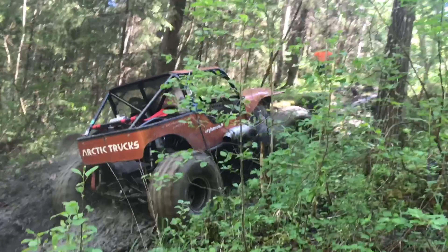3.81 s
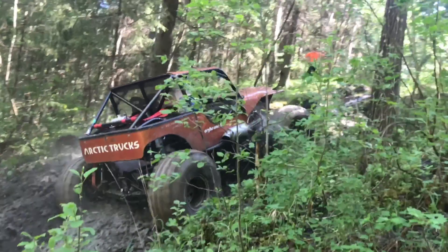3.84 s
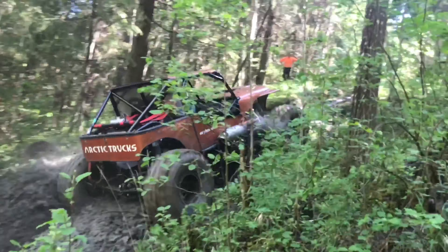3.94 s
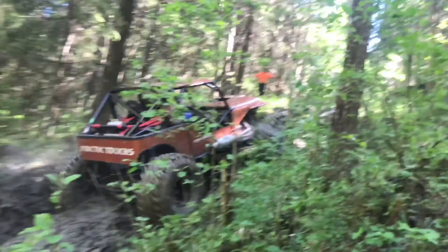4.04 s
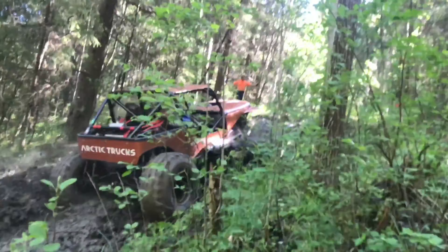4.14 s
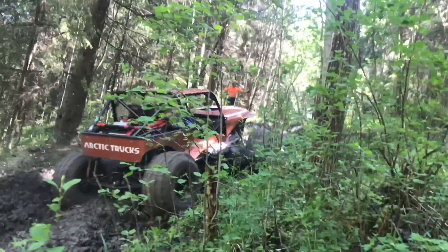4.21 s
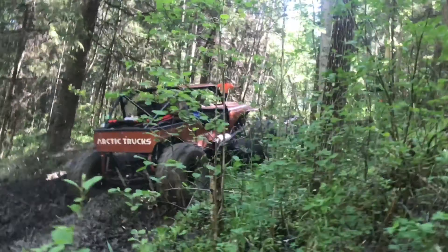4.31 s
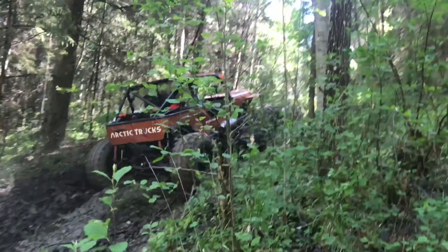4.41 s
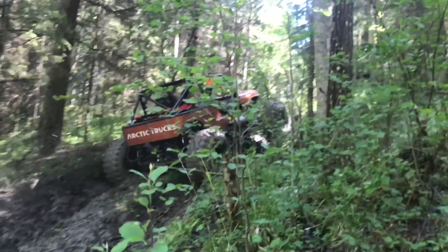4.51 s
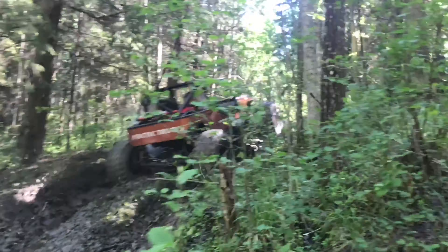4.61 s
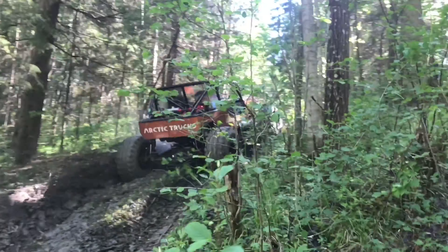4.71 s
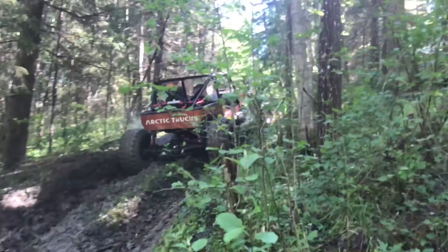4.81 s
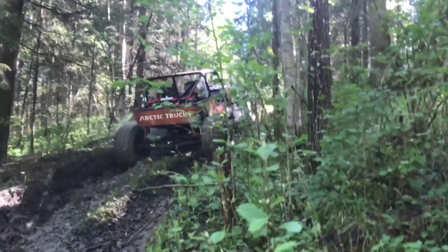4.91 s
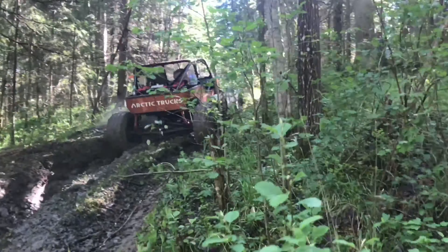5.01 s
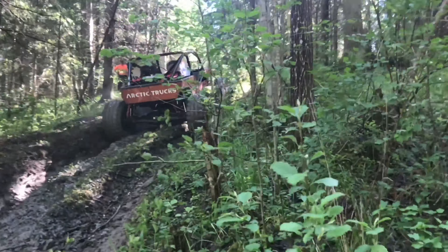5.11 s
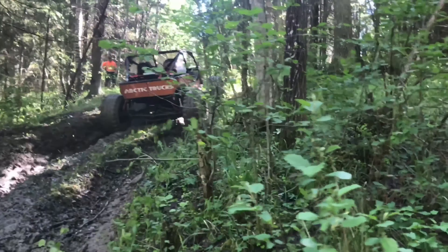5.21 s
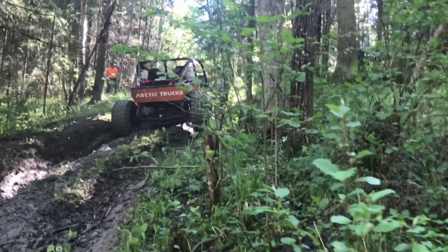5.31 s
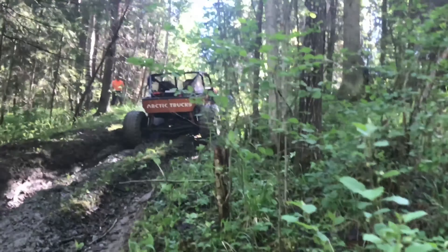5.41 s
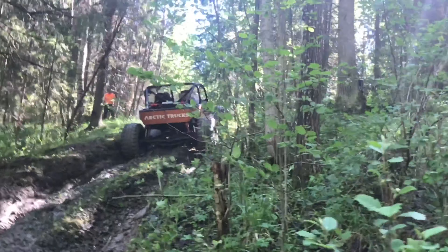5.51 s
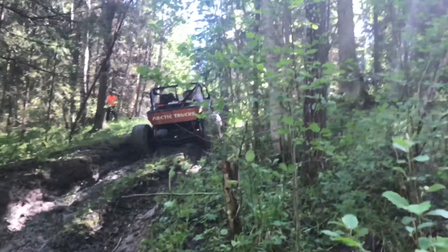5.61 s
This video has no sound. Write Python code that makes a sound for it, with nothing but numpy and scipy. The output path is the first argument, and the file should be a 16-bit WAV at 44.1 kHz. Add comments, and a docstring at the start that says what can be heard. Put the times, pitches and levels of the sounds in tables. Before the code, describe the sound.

Uneven V8 exhaust, close and loud, on a forest track. Short revs rise and sag without ever falling silent; the early ones are deep and roaring, the middle ones high and blaring, the later ones rasping with sharp backfire pops. It stumbles, falls to a gruffer growl, then gives a final rising rev. Trees return a faint scattered echo, and the loudest peaks are squashed by the microphone.

```python
"""On a forest track, an off-road V8 is revved hard again and again, close to the microphone.
The crank angle times a deep, uneven throb of engine orders and a click for each firing.
Each click is a shock front with turbulent gas behind it; resonant passages turn it to bark, roar, blare and rasp.
Noise bursts crack in the pipe and thuds boom; a forest echo and an overloaded microphone follow."""
import sys
import numpy as np
from scipy import signal
from scipy.fft import rfft, irfft
from scipy.io import wavfile
from scipy.ndimage import uniform_filter1d

SR = 44100
rng = np.random.default_rng(int(sys.argv[2]) if len(sys.argv) > 2 else 0)


def file_out(sig):
    """Save sig as 16-bit WAV at sys.argv[1]."""
    # one column per channel
    cols = np.atleast_2d(sig).T
    # limit, then scale
    lim = np.clip(cols, -1, 1)
    pcm = np.round(lim * 32767).astype(np.int16)
    wavfile.write(sys.argv[1], SR, pcm)


N = 249949

# Strength of the eight firings of a cycle; the near bank gives the strong ones. Each entry: level in dB.
FIRING_STRENGTHS = [1.5, -34, -9, 1, -15.5, 0.5, -4, -13.5]
# Afterfire cracks in the exhaust. Each row: time in seconds, level in dB.
AFTERFIRE_CRACKS = [(2.5924, -2.5), (3.0678, -7.5), (3.0824, -2.5), (3.1157, -2), (3.1663, -9), (3.2106, 0),
                    (3.2299, -1.5), (3.2437, -1.5), (3.2688, 0), (3.4106, -11), (3.485, -9.5), (3.546, -10),
                    (3.5983, -2.5), (3.646, -1), (4.0237, -4.5), (4.07, -1), (4.576, -17), (4.624, -12.5),
                    (4.6382, -7), (4.752, -8), (4.801, -16), (5.319, -14)]
# Colour of the low bark of the pipe. Each row: frequency in Hz, level in dB.
BARK_COLOUR = [(260, -18.5), (320, -14.5), (390, -8), (450, -9), (540, 4.5), (610, 3.5), (720, -1),
               (820, -5.5), (1100, -17)]
# Colour of the brassy blare above it. Each row: frequency in Hz, level in dB.
BLARE_COLOUR = [(900, -21.5), (1250, -4), (1450, -3.5), (1800, -2.5), (2150, -3.5), (2500, -11.5),
                (3300, -29)]
# Colour of the harsh rasp. Each row: frequency in Hz, level in dB.
RASP_COLOUR = [(1700, -16), (2150, -7.5), (2500, 2), (2900, 1.5), (3350, -0.5), (3850, -7.5), (4450, -10),
               (5000, -20)]
# Colour of the hiss of escaping gas. Each row: frequency in Hz, level in dB.
HISS_COLOUR = [(2880, -22), (4900, -12.5), (5320, 0), (6060, -5), (6900, 3), (7560, -1.5), (8650, 2.5),
               (10300, -4), (11400, -2), (12700, -3.5), (13400, -6.5), (15500, -19)]
# Presses of the throttle. Each row: opens in seconds, eases in seconds, engine cycles per second as it opens,
# cycles per second as it eases, bend of the leg between, bend of the leg after it
# (bends have no unit: 0 straight, above 0 fast at first).
THROTTLE_PRESSES = [(0.0, 0.27, 12.3, 22.0, 0.0, 1.5), (0.674, 0.93, 12.7, 18.4, 0.0, 0.0),
                    (0.971, 1.266, 19.5, 30.3, -0.0, 1.5), (1.491, 1.816, 23.9, 34.7, 0.5, -0.8),
                    (1.918, 2.475, 24.3, 39.8, 1.7, 2.3), (2.598, 2.849, 27.5, 34.8, 1.4, 1.5),
                    (3.076, 3.362, 16.5, 30.3, -0.2, 2.9), (3.575, 3.797, 18.8, 30.2, 0.5, 3.0),
                    (3.98, 4.247, 18.8, 29.4, 0.8, -0.6), (4.605, 4.87, 15.1, 22.6, 0.0, -1.5),
                    (5.03, 5.28, 22.2, 19.6, 0.0, 0.0), (5.414, 5.665, 19.2, 31.7, 1.1, 1.0)]


def from_db(db):
    """Decibels to amplitude ratio."""
    return 10 ** (np.asarray(db) / 20)


def rms_one(x):
    """Scale the whole signal to unit RMS."""
    return x / np.sqrt(np.mean(x ** 2) + 1e-20)


def at_hz(points, hz):
    """Read a spectrum on a log-frequency axis."""
    f, db = np.transpose(points)
    return np.interp(np.log(np.maximum(hz, 1)), np.log(f), db)


def drift(rate_hz):
    """Slow chance with a spread of about 1: noise through two equal low-pass poles."""
    step = 40  # drawn once per 40 samples
    r = np.exp(-2 * np.pi * step * rate_hz / SR)
    noise = rng.standard_normal(N // step + 2002)
    slow = signal.lfilter([1], [1, -2 * r, r * r], noise)[2000:]
    return np.interp(np.arange(N) / step, np.arange(len(slow)), rms_one(slow))


def colour(x, spectrum, size=8192):
    """Causal (minimum-phase) filter with the given spectrum, made by folding its cepstrum."""
    gain = from_db(at_hz(spectrum, np.arange(size // 2 + 1) * SR / size))
    cepstrum = irfft(np.log(gain))
    cepstrum[1:size // 2] *= 2
    cepstrum[size // 2 + 1:] = 0
    response = irfft(np.exp(rfft(cepstrum)))
    return signal.fftconvolve(x, response)[:N]


def band(x, spectrum):
    """A resonant passage: its spectrum, with steep skirts beyond both ends."""
    edges_hz = np.clip([spectrum[0][0], spectrum[-1][0]], 10, SR * .45)
    skirts = signal.butter(2, edges_hz, "band", fs=SR, output="sos")
    return signal.sosfilt(skirts, colour(x, spectrum))


def fade(clicks, seconds):
    """Each click dies away exponentially."""
    return signal.lfilter([1], [1, -np.exp(-1 / (seconds * SR))], clicks + 1e-18)


def even(x, size=2600):
    """Hold the level near 1, averaged over the length of an engine cycle or so."""
    power = uniform_filter1d(uniform_filter1d(x * x, size), size)
    return x / np.sqrt(np.abs(power) + 1e-14)


def settle(x, seconds):
    """Follow a control with a first-order lag."""
    r = np.exp(-1 / (seconds * SR))
    return x[0] + signal.lfilter([1 - r], [1, -r], x - x[0])


def strikes(rows):
    """One click per row of (s, dB)."""
    s, db = np.transpose(rows)
    return np.bincount((s * SR).astype(int), from_db(db), N)


def forest(x, t60_s, echoes_per_s):
    """Many faint echoes from the trunks, scattered at random and dying away."""
    # What the trees send back. Each row: frequency in Hz, level in dB.
    trunk_colour = [(40, -38), (300, 4), (3000, -6), (8000, 0.5), (16000, -58)]
    t = np.arange(SR) / SR
    echoes = rng.standard_normal(SR) * (rng.random(SR) < echoes_per_s / SR)
    echoes = echoes * (t > .008) * from_db(-60 * t / t60_s)  # no echo sooner than 8 ms
    echoes = echoes / np.sqrt(np.sum(echoes ** 2))
    return colour(signal.fftconvolve(x, echoes)[:N], trunk_colour)


def ground(x, delay_s, echo_db):
    """The bank of the track returns each pulse; the path shifts as the truck rocks."""
    n = np.arange(N)
    delay = delay_s * SR * (1 + 0.07 * drift(0.575))
    return x + from_db(echo_db) * np.interp(n - delay, n, x, left=0)


def afterfire(crack_db, thud_db, thud_hz):
    """Unburnt fuel cracks in the pipe as clicks with noise; dull thuds boom in the pipe's lowest mode."""
    # Dull thuds as the engine stumbles. Each row: time in seconds, level in dB.
    dull_thuds = [(.355, -13.5), (.93, -20), (.975, -12.5), (2.455, -14)]
    clicks = strikes(AFTERFIRE_CRACKS)
    burst = fade(clicks, .005) * rng.standard_normal(N) + from_db(14) * clicks
    body = from_db(0.5) * band(burst, BLARE_COLOUR) + from_db(2.0) * band(burst, BARK_COLOUR)
    cracks = band(burst, RASP_COLOUR) + body + from_db(-15.0) * band(burst, HISS_COLOUR)
    t = np.arange(SR // 4) / SR
    swell = t / .014  # the boom is fullest after 14 ms
    boom = np.sin(2 * np.pi * thud_hz * t) * swell * np.exp(1 - swell)
    thuds = signal.fftconvolve(strikes(dull_thuds), boom)[:N]
    return from_db(crack_db) * cracks + from_db(thud_db) * thuds


def misfires(depth):
    """A charge that fails to burn leaves a short lull just before it cracks in the pipe."""
    t = np.arange(N) / SR
    lull = sum(np.interp(t, [s - .02, s - .012, s, s + .003], [0, 1, 1, 0]) for s, db in AFTERFIRE_CRACKS)
    return 1 - np.clip(depth, 0, 1) * np.minimum(lull, 1)


def engine_speed():
    """Cycles per s: each press carries the engine to its easing speed, then it bends towards the next."""
    flywheel_s = .025  # rounds the turns of the speed
    opens, eases, start, top, climb_bend, fall_bend = np.transpose(THROTTLE_PRESSES)
    turns_s = np.append(np.ravel([opens, eases], "F"), N / SR + flywheel_s)
    turns = np.append(np.ravel([start, top], "F"), top[-1])
    bend = np.ravel([climb_bend, fall_bend], "F") + 1e-6
    place = np.interp(np.arange(N) / SR, turns_s, np.arange(len(turns)))
    leg, part = np.divmod(place, 1)
    leg = np.minimum(leg.astype(int), len(bend) - 1)
    progress = np.expm1(-bend[leg] * part) / np.expm1(-bend[leg])
    speed = turns[leg] + np.diff(turns)[leg] * progress
    return uniform_filter1d(speed, int(flywheel_s * SR), mode="nearest")


def throttle():
    """How far the throttle is shut (the pedal sinks through each press, then lifts), and that press's levels."""
    # How hard each press drives the engine. Each row: pedal travel left at the opening 0-1, lift afterwards 0-1,
    # then relative levels at full throttle and middle speed: 3rd order in dB, 5th order in dB, firing order
    # in dB, burble in dB, pipe bark in dB, bay roar in dB, blare in dB, rasp in dB;
    # last, steepness of the pulses over the steady gas flow in dB, to which each voice adds its own offset.
    press_loads = [(0.43, 0.49, -26, -24.5, -25, -17, -25.5, -24.5, -28.5, -25.5, -5),
                   (0.41, 0.0, -33, -19, -23, -14, -26, -21, -30.5, -25, -2.5),
                   (0, 0.58, -13.0, -14.5, -26, -24.5, -28.5, -20.5, -29.5, -28.5, -1.5),
                   (0.41, 0.84, -8.0, -17, -25, -23, -26.5, -20, -25.5, -25.0, -3),
                   (0.43, 0.73, -6.0, -22, -20.5, -18, -23, -19, -20, -22, -5),
                   (0.0, 0.98, -6.5, -22.0, -20.5, -17.5, -22.5, -22, -20, -21, 0.0),
                   (0.41, 1, -10, -19, -23.5, -15, -20, -27, -19, -16.5, 7.5),
                   (0.053, 0.99, -12, -20, -23.5, -19, -20, -29, -26, -16.5, 13),
                   (0.3, 0.97, -13.0, -16, -23, -21.5, -22.5, -25, -26, -17.5, 11.5),
                   (0.26, 0.12, -20.5, -21.5, -34.5, -20, -26.0, -25, -33, -26, 3.5),
                   (0.26, 0.05, -20.0, -28.5, -29.5, -16, -27, -28, -32, -27.5, 2.5),
                   (0.13, 0.18, -16, -13.5, -12.5, -16, -21, -21.5, -20, -17.5, 3.5)]
    pickup_s = 0.0079  # the engine takes load this long after the throttle opens
    overrun_s = 0.014  # the speed still climbs this long after the load is gone
    t = np.arange(N) / SR
    opens, eases, *_ = np.transpose(THROTTLE_PRESSES)
    press = np.searchsorted(opens[1:] + pickup_s, t)
    travel, lift, *levels_db = np.array(press_loads)[press].T
    to_go = np.clip((eases[press] - t) / (eases - opens)[press], 0, 1)
    shut = np.where(t > eases[press] - overrun_s, lift, travel * to_go ** 2)
    return np.clip(shut, 0, 1), levels_db


def voice_db(press_db, law, speed, shut):
    """Level of a voice: it shifts with speed, and sinks when the pedal lifts or the engine stumbles."""
    # The engine briefly stops firing cleanly. Each row: start in seconds, end in seconds, loss in dB.
    stumbles = [(2.99, 3.06, 3.5), (3.178, 3.19, 8), (3.436, 3.467, 13), (3.82, 3.844, 9),
                (4.44, 4.588, 11.5)]
    middle_speed = 25  # four-stroke cycles per s
    doubling_db, shut_db, response_s = law
    t = np.arange(N) / SR
    stumble_db = sum(db * ((t > start) & (t < end)) for start, end, db in stumbles)
    load_db = settle(press_db - shut_db * shut - stumble_db, response_s)
    return doubling_db * np.log2(speed / middle_speed) + load_db


def voice_levels(press_db, speed, shut):
    """Levels of the eight voices, each by its own law of speed and throttle."""
    # Each law: dB per doubling of speed, dB lost with the throttle shut, response time in seconds.
    third_law = (.1, 7.8, 0.023)
    fifth_law = (-5.5, 4.6, 0.06)
    firing_law = (-16.5, 16.6, 0.034)
    burble_law = (0.2, 7.4, 0.01)
    bark_law = (8.4, 10.6, 0.0054)
    roar_law = (2.5, 13.7, 0.019)
    blare_law = (2.7, 15.9, 0.0096)
    rasp_law = (5.2, 10.4, 0.017)
    laws = third_law, fifth_law, firing_law, burble_law, bark_law, roar_law, blare_law, rasp_law
    return [voice_db(db, law, speed, shut) for db, law in zip(press_db, laws)]


def firings(cycles, scatter_db, jitter_s):
    """One click per firing, each a little off in strength and time."""
    count = np.floor(cycles * len(FIRING_STRENGTHS)).astype(int)
    at = np.flatnonzero(np.diff(count)) + 1
    chance = rng.standard_normal((len(at), 2))
    pattern_db = np.array(FIRING_STRENGTHS)[count[at] % len(FIRING_STRENGTHS)]
    strength = from_db(pattern_db + scatter_db * chance[:, 0])
    moved = at + (jitter_s * SR * chance[:, 1]).astype(int)
    return np.bincount(np.clip(moved, 0, N - 1), strength, N)


def blast(clicks, steep_db, puff_db, puff_s):
    """A shock front, the puff of turbulent gas behind it, and the steady flow between pulses."""
    puffs = even(fade(clicks, puff_s) * rng.standard_normal(N))
    pulses = even(even(clicks) + from_db(puff_db) * puffs)
    return pulses * from_db(steep_db) + rng.standard_normal(N)


def bay_roar(fronts, steep_db):
    """The engine bay roars: noisy puffs through its own resonant band."""
    # Colour of the engine bay. Each row: frequency in Hz, level in dB.
    bay_colour = [(550, -15), (760, 0), (900, 4), (1020, -3.5), (1160, 1), (1350, -10.5), (1800, -25)]
    return even(band(blast(fronts, steep_db + 5.0, puff_db=6.5, puff_s=0.0032), bay_colour))


def gas_hiss(fronts, steep_db):
    """The gas jet hisses: mostly turbulence, pulsing with each firing."""
    return even(band(blast(fronts, steep_db - 1, puff_db=9, puff_s=.0025), HISS_COLOUR))


def tailpipe(x):
    """Damped resonances in parallel, signs alternating."""
    # Overtones rung by each shock front. Each row: frequency in Hz, width in Hz, level in dB.
    overtones = [(2400, 920, -13.5), (2955, 475, -4), (3160, 220, -5.5)]
    out = 0
    for k, (hz, width_hz, db) in enumerate(overtones):
        r = np.exp(-np.pi * width_hz / SR)
        poles = [1, -2 * r * np.cos(2 * np.pi * hz / SR), r * r]
        out = out + (-1) ** k * from_db(db) * signal.lfilter([1 - r, 0, r - 1], poles, x)
    return out


def pipe_rasp(sharp, fronts, steep_db):
    """Sharp pulses rasp; steep fronts make the tailpipe ring out of the rasp."""
    ring = even(tailpipe(ground(fronts, delay_s=.0042, echo_db=-12)))
    return even(even(band(sharp, RASP_COLOUR)) + from_db(steep_db - 11.5) * ring)


def pipe_bark(fronts, steep_db):
    """The body of a pulse repeats closely, so the low bark keeps its harmonics."""
    pulses = blast(fronts, steep_db + 7, puff_db=-5, puff_s=.004)
    return even(band(ground(pulses, delay_s=0.00292, echo_db=-8.5), BARK_COLOUR))


def throb(cycles, speed, main_db, burble_db, order_rough, clean_rough, lag_s):
    """The low exhaust tone: the uneven firing pattern stresses orders 3, 5 and 8; the rest burble."""
    # The weaker engine orders. Each row: multiple of the cycle rate, level in dB.
    weak_orders = [(2, 0.5), (4, -9.5), (6, -4), (7, -8.5), (9, -6), (10, -15), (11, -1), (12, -14),
                   (13, -10)]
    # Pipe response to the weaker orders. Each row: frequency in Hz, level in dB.
    pipe_response = [(25, -35), (42, -15.5), (60, 2.5), (160, 1), (240, -8), (290, -9.5), (360, 0.5),
                     (450, -6.5), (600, -22)]
    # Colour of the noise under the burble. Each row: frequency in Hz, level in dB.
    rumble_colour = [(22, -6), (38, -8), (55, -6.5), (90, -15), (160, -5.5), (240, -5), (400, -13.5),
                     (700, -35)]
    slots = np.arange(len(FIRING_STRENGTHS)) / len(FIRING_STRENGTHS)

    def order(k, rough):
        """One multiple of the cycle rate, in step with the firings and wavering a little."""
        pattern = np.sum(from_db(FIRING_STRENGTHS) * np.exp(-2j * np.pi * k * slots))
        wave = np.exp(1j * (2 * np.pi * k * (cycles - lag_s * speed) + np.angle(pattern)))
        waver = 1 + rough * (drift(6) + 1j * drift(6))
        return -np.sqrt(2) * np.real(wave * waver)

    main = sum(from_db(db) * order(k, clean_rough) for k, db in zip((3, 5, 8), main_db))
    rest = sum(from_db(db + at_hz(pipe_response, k * speed)) * order(round(k), order_rough)
               for k, db in weak_orders)
    rumble = rms_one(band(rng.standard_normal(N), rumble_colour))
    burble = rest + from_db(-9) * rumble
    return from_db(0.06) * main + from_db(burble_db - 3.5) * burble


def scene():
    """The crank angle times the engine's layers; throttle and speed set how hard they sound."""
    speed = engine_speed()
    shut, (*press_db, steep_db) = throttle()
    *main_db, burble_db, bark_db, roar_db, blare_db, rasp_db = voice_levels(press_db, speed, shut)
    cycles = np.cumsum(speed) / SR
    fronts = firings(cycles, scatter_db=2.3, jitter_s=.0001)
    # blare and rasp share the same sharp pulses
    sharp = ground(blast(fronts, steep_db, puff_db=3.5, puff_s=.0025), delay_s=.0042, echo_db=-8)
    bark = from_db(bark_db - 1.07) * pipe_bark(fronts, steep_db)
    roar = from_db(roar_db - 0.64) * bay_roar(fronts, steep_db)
    blare = from_db(blare_db + 0.63) * even(band(sharp, BLARE_COLOUR))
    rasp = from_db(rasp_db - 0.15) * pipe_rasp(sharp, fronts, steep_db)
    hiss = from_db(rasp_db - 11.0) * gas_hiss(fronts, steep_db)
    voices = misfires(depth=.35) * (bark + roar + blare + rasp + hiss)
    pipe = voices + afterfire(crack_db=0.0, thud_db=6, thud_hz=57)
    # the negative lag sets the throb ahead of the firings
    low = throb(cycles, speed, main_db, burble_db, order_rough=.3, clean_rough=.07, lag_s=-.003)
    echoes = from_db(-8.5) * forest(pipe, t60_s=0.46, echoes_per_s=900)
    return (low + pipe + echoes)[None]


def record(dry):
    """The microphone is close to overload: the loudest peaks are squashed and the top is cut."""
    cutoff_hz = 15800
    squashed = dry / (1 + (dry / .98) ** 8) ** (1 / 8)
    top_cut = signal.ellip(10, .1, 90, cutoff_hz, fs=SR, output="sos")
    return signal.sosfilt(top_cut, squashed)


dry = scene()
out = record(dry)
file_out(out)
```